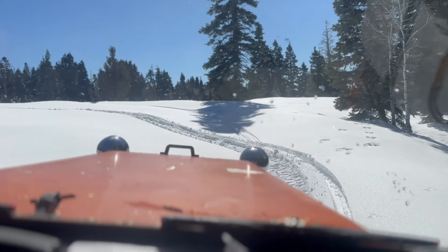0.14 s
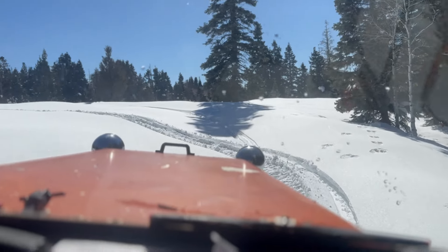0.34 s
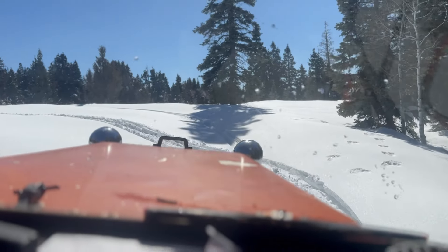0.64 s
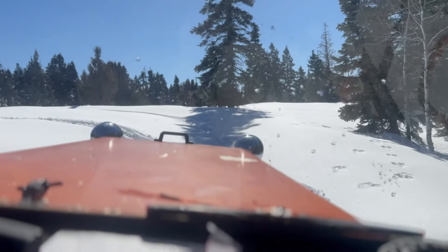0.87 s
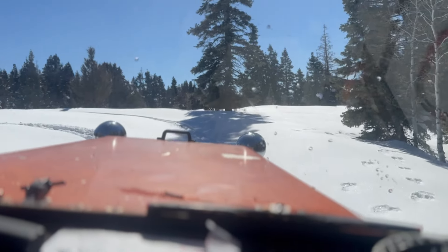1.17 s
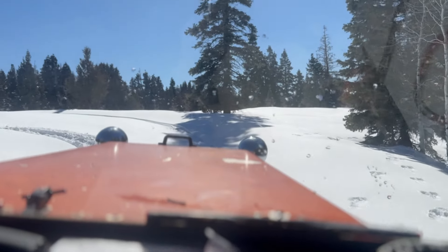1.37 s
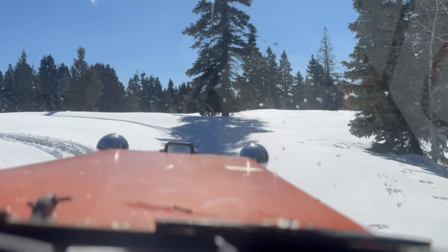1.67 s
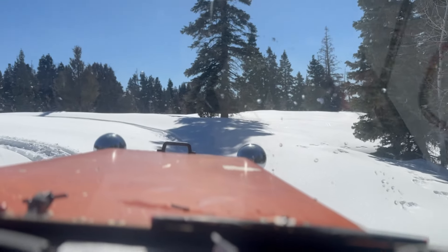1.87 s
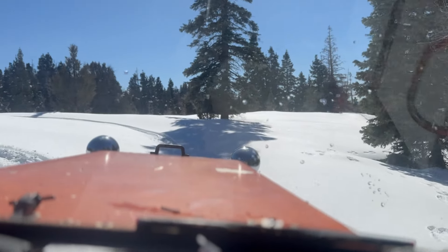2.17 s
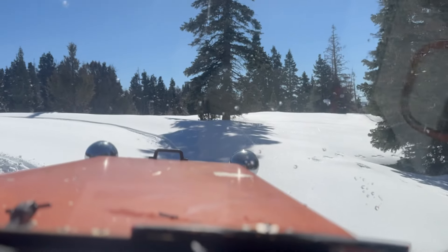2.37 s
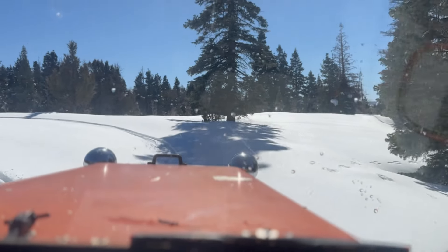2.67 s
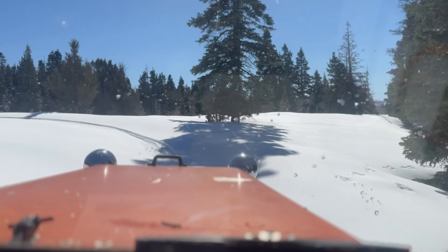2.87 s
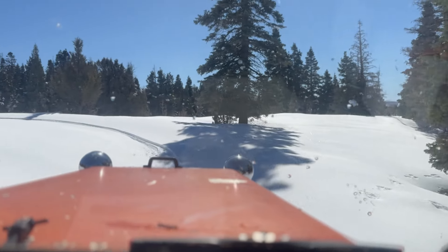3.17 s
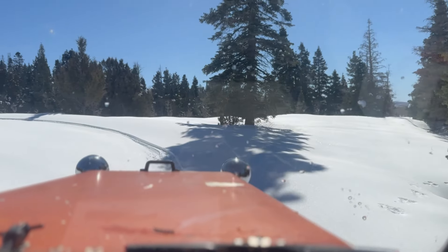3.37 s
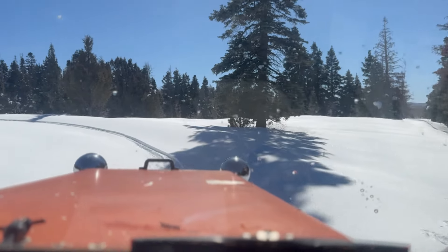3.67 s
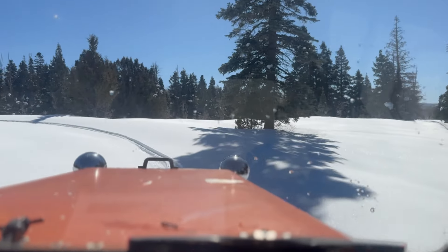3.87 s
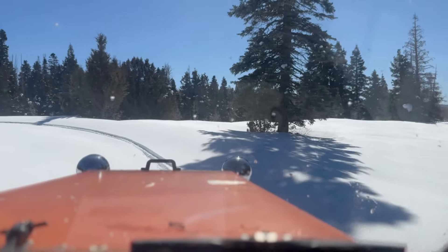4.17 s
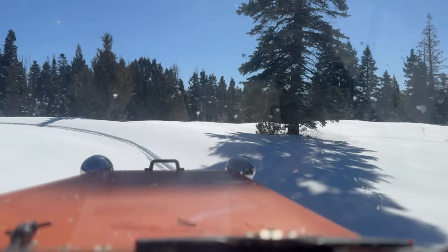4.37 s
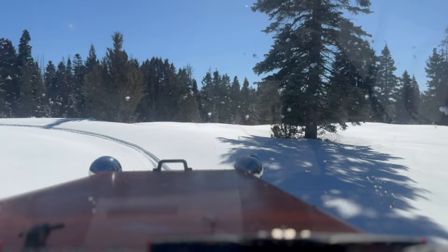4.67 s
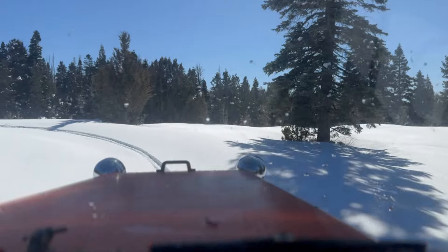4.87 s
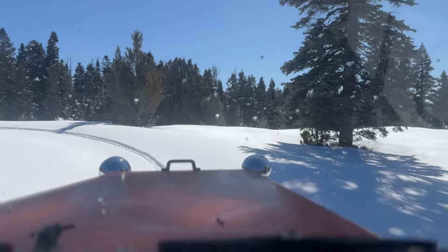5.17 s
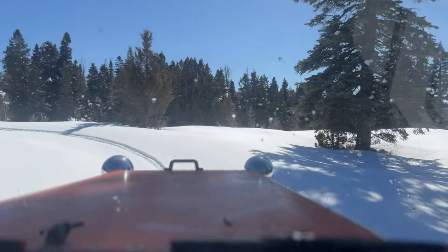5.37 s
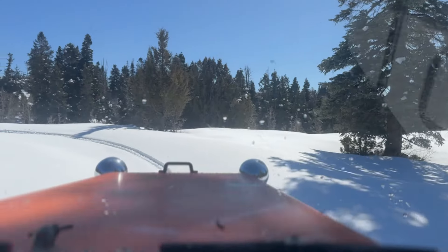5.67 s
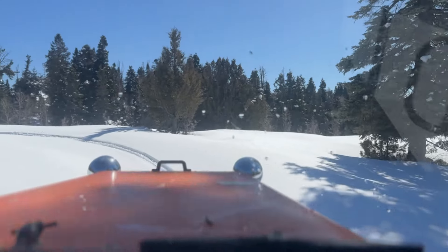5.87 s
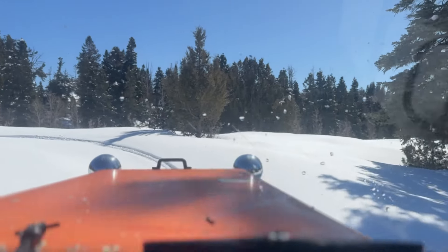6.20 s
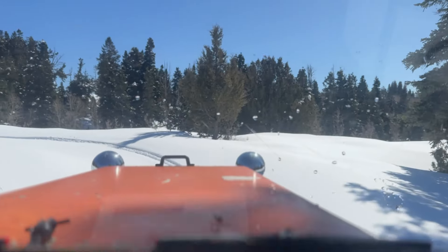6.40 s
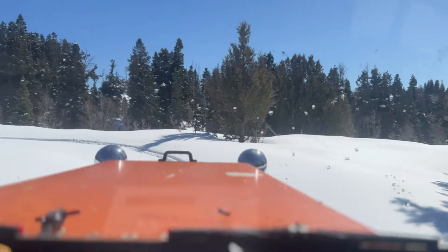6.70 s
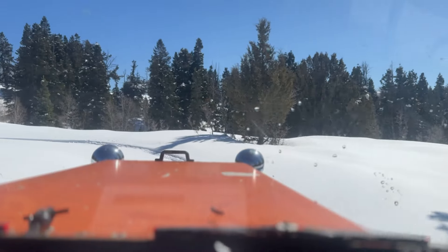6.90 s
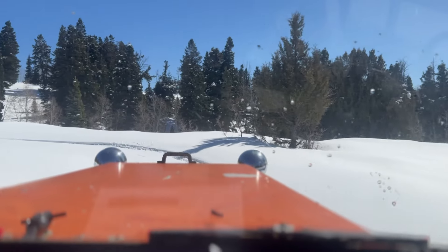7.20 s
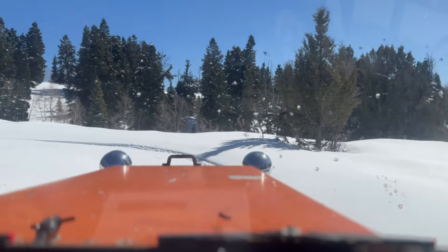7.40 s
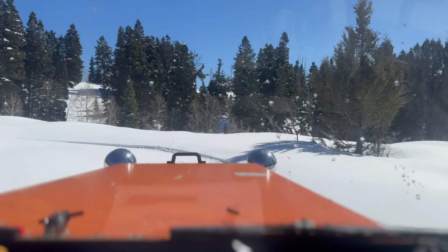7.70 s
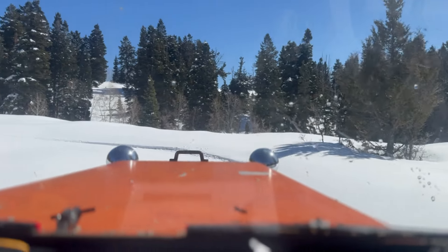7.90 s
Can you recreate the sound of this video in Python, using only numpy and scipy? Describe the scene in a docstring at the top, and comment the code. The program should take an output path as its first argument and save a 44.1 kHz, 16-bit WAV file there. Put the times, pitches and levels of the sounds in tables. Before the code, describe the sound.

A steady drive over packed snow, captured in a small resonant cab. A dominant low engine hum holds throughout, sagging gently in pitch, rising a little midway, then sinking and growing boomier. Beneath it is rough track rumble; above it are growling overtones, combustion clatter, a wavering fan whine, thin metallic ringing and faint grainy hiss. Light rattling ticks and brief dull knocks punctuate the unbroken drone.

```python
"""Tracked snow vehicle, cab interior

Steady drive along a trail, engine near 1600 rpm. The fifth order booms, louder as the engine slows
towards a cab air resonance; the other orders are sine tones whose levels move with the crank speed.
Cleat tones and low noise rumble through the floor; a belt-driven fan and other accessories whine.
Pulsed noise is the clatter of combustion and valves; loose fittings tick, bodywork knocks and rings,
thin metallic partials come and go, and a faint grainy hiss lies on top."""
import sys
import numpy as np
from scipy import signal
from scipy.fft import rfft, irfft, next_fast_len
from scipy.io import wavfile

SR = 44100
rng = np.random.default_rng(int(sys.argv[2]) if len(sys.argv) > 2 else 0)


def store_wav(level_fs):
    """Save 16-bit WAV to argv[1]."""
    pcm = np.round(np.clip(np.atleast_2d(level_fs), -1, 1) * 32767)
    wavfile.write(sys.argv[1], SR, pcm.T.astype(np.int16))


N = 355005

CONTROL_STEP = 100  # samples between slow control values
CRUISE_TURNS_PER_S = 26.4
CLEATS_PER_TURN = .752
FAN_BLADES_PER_TURN = 24.9  # at mean speed
FAN_SLIP_S_PER_TURN = .005  # share of blade rate lost per turn/s below mean speed
CUTOFF_HZ = 15900

# crank speed: (time [s], speed [turns/s])
CRANK_SPEED = [(0, 27.18), (0.25, 27.05), (0.7, 26.71), (1.15, 26.78), (1.65, 26.35), (2.05, 26.26),
               (2.75, 26.44), (3.45, 27.12), (3.9, 27.25), (4.45, 27.23), (4.85, 26.72), (5.25, 26.23),
               (5.7, 25.37), (6.15, 25.49), (6.5, 25.93), (6.95, 26.07), (7.35, 25.71), (8.05, 25.51)]
# strong engine tones: (order [per crank turn], level away from resonance [dB])
BOOM_ORDERS = [(3, -34), (4, -38), (5, -20), (8, -40.5)]
# cab air resonances: (centre [Hz], width [Hz], lift [dB])
CAB_AIR = [(76.6, 5.1, 9), (127.86, 15.6, 7), (201.9, 25, 12.5)]
# weaker engine tones: (order [per crank turn], left [dB], right [dB] at cruise before trim,
# rise [dB per turn/s above cruise], bow [dB per (turn/s)^2], right-ear lag [rad])
GROWL_ORDERS = [(6, -35.5, -32.5, 2.5, 1.0, -0.2), (7, -46.0, -38.5, -7.0, -1.0, -0.2),
                (11, -43.0, -40.5, 1.5, 4.0, 1.1), (12, -43.0, -48.0, -2.5, 0.0, 0.1),
                (13, -38.0, -41.0, 0.0, 1.0, -0.0), (14, -44.0, -45.0, -1.0, -3.0, 1.5),
                (15, -48, -49, 0, 0, 0.5), (16, -43.5, -45.0, -1.5, 1.0, -1.6),
                (17, -58.5, -47.5, -4.0, 4.0, -1.2), (18, -45.5, -44.0, 2.5, 0.0, -0.8),
                (19, -50.5, -47.5, 6.5, 2.0, -1.7), (20, -64.0, -54.0, -7.0, 3.0, -1.5),
                (21, -54.5, -40.5, 4.5, 2.0, -2.6), (22, -45.5, -39.0, 4.0, -3.0, -0.5),
                (23, -60.0, -50.0, -7.0, -2.0, -0.5), (24, -53.5, -52.0, -0.5, 2.0, -0.5),
                (25, -46.5, -45.5, 5.5, -7.0, -0.3), (26, -50.0, -51.5, 3.5, 1.0, -2.2),
                (27, -46.5, -49.5, 1.0, 5.0, -0.1), (28, -51.0, -46.0, 1.5, -2.0, 0.7),
                (29, -60.5, -52.0, 3.5, 3.0, -0.3), (30, -53.0, -54.0, 1.0, 2.0, 1.2),
                (31, -51.5, -51.5, -13, -14, 0.1), (32, -55.5, -56.0, -7.0, 5.0, 1.9),
                (33, -54.5, -56.0, 1.0, 5.0, -1.9), (35, -51.5, -54.5, 2.0, 0.0, -1.0),
                (36, -54.0, -54.5, 2.0, 8.0, -0.6), (37, -51.5, -45.0, -0.5, -5.0, -1.7),
                (38, -50.0, -55.5, -2.5, 2.0, -2.1), (39, -51.5, -47.0, -4.0, -5.0, -1.5),
                (40, -54.5, -52.5, -3.0, 3.0, -1.4), (41, -55.5, -56.0, 0.0, 7.0, -1.5),
                (49, -56.5, -56.0, 0.5, 7.0, -0.9), (50, -58.5, -57.0, 7.0, 5.0, -1.1),
                (53, -56.0, -55.5, 5.0, 0.0, -1.9), (54, -54.0, -55.0, 0.0, -2.0, 3.1),
                (64, -54, -58, 7, -9, 0.2)]
# momentary swells or dips of single tones: (time [s], length [s], order [per crank turn], lift [dB])
SWELLS = [(.55, .6, 22, 4), (1.6, .7, 22, -4), (3.15, .6, 22, 4), (4.1, .9, 22, -3), (6.4, 1.1, 22, -12),
          (5.12, .25, 31, 4), (6.95, .5, 31, 6), (7.3, .4, 36, 10.5), (7.87, .2, 36, 7), (1.05, .45, 64, 6),
          (3.1, .45, 64, 7), (4.65, .3, 64, 4), (5.2, .4, 64, 9), (8.05, 3, 15.4, -8)]
# accessory tones: (order [per crank turn], level [dB])
ACCESSORIES = [(15.4, -44), (24.2, -51), (45.38, -50.5), (46.2, -52), (58.3, -56), (93.1, -62)]
# cab panel resonances: (centre [Hz], width [Hz], lift at full share [dB])
PANELS = [(588, 38, 12.5), (630, 36, 11), (733, 17, 7.5), (805, 19, 12), (985, 80, 7), (1178, 34, 15),
          (1354, 93, 9), (1712, 50, 12), (2530, 40, 9)]
# ringing metal of engine and fittings: (centre [Hz], width [Hz], lift [dB])
METAL = [(3610, 40, 5.5), (4000, 35, 3), (4400, 50, 3.5), (5205, 62, 4), (5440, 60, 3), (5790, 60, 8),
         (5950, 90, 7.5)]
# mechanical noise density before trim and resonances: (frequency [Hz], left [dB/Hz], right [dB/Hz])
CLATTER_SPECTRUM = [(247, -59.5, -54), (307, -59.5, -59.5), (378, -59.5, -60), (460, -62, -62.5),
                    (517, -66, -63.5), (646, -59.5, -61.5), (705, -67, -67), (756, -64.5, -64),
                    (844, -66, -64), (970, -60.5, -63), (1130, -68, -67.5), (1200, -65.5, -67.5),
                    (1370, -65, -67.5), (1460, -69.5, -66.5), (1820, -72, -73), (2040, -72, -68.5),
                    (2250, -80, -77), (2370, -74.5, -72), (2650, -77, -75), (2960, -74, -76.5),
                    (3630, -80, -82.5), (4970, -82, -86.5), (6400, -83, -90.5), (7650, -81.5, -89.5),
                    (9530, -92, -87.5), (10060, -101, -101)]
# noise common to both ears: (frequency [Hz], share of power [0-1])
EAR_LIKENESS = [(200, .8), (400, .58), (1000, .58), (4000, .33), (8000, .7), (14000, .8)]
# upper clatter band: (time [s], level [dB])
HARDNESS = [(0, -0.5), (1.5, -1), (3.2, 0), (3.8, 0), (4.5, 1.5), (4.75, -1), (5.5, -1.5), (6.1, 0),
            (8.05, -0.5)]
# fan singing out: (time [s], length [s], multiple of blade rate, lift [dB])
WHINES = [(.08, .25, 3, 6), (1.88, .44, 3, 11.5), (2.93, .16, 3, 6), (5.27, .55, 3, 12.5), (5.95, .8, 1, 5),
          (6.75, .68, 3, 12.5)]
# track cleats: (multiple of cleat rate, level before ride [dB])
CLEATS = [(1, -50), (2, -30), (3, -28.5), (6, -27), (12, -45)]
# harder cleat slaps: (time [s], length [s], multiple of cleat rate, lift [dB])
SLAPS = [(.55, .4, 3, 6), (1.75, .6, 2, 9), (3.45, .35, 3, 8), (4.35, .4, 6, 12.5), (6.25, .4, 2, 8),
         (7.15, .35, 2, 8)]
# running gear through the floor, before ride and trim: (frequency [Hz], density [dB/Hz])
RUMBLE_SPECTRUM = [(16, -81), (24, -75.5), (37, -46), (60, -36.5), (90, -36.5), (115, -35.5), (160, -39.5),
                   (190, -43.5), (240, -56)]
# ride roughness: (time [s], gain on all track sound [dB])
RIDE = [(0, -3.5), (1.1, -4.5), (1.9, -4.5), (2.7, -2.5), (3.4, -6), (4.1, -6.5), (4.8, -3), (5.3, -6),
        (5.9, -4.5), (6.6, -5.5), (7.3, -4.5), (8.05, -5)]
# loose fittings: (time [s], nominal level [dB])
TICKS = [(.83, -37), (1.1, -39), (1.4, -46), (2.73, -44), (2.976, -41), (3.126, -41), (4.34, -37),
         (4.431, -44), (6.139, -46), (6.575, -45), (7.615, -47)]
# bodywork blows: (time [s], nominal level [dB])
KNOCKS = [(1.422, -33), (7.365, -27), (7.369, -32), (7.718, -37), (7.884, -35)]
# bodywork modes: (frequency [Hz], mean level re blow [dB], t60 [s])
BODYWORK = [(921, -6, .05), (1310, -5, .03), (1604, 0, .035), (1900, -7, .02), (2290, -6, .022),
            (2510, -13, .04)]
# thin metallic rings: (time [s], length [s], frequency [Hz], level before pan [dB])
RINGS = [(.75, 1.0, 3610, -64), (1.4, .4, 5965, -64), (2.6, .5, 4375, -66), (2.7, .5, 5950, -66),
         (3.85, .5, 3595, -62), (4.0, .9, 4004, -62), (4.1, .8, 4400, -62), (4.45, 0.3, 4410, -58.5),
         (6.03, 0.25, 5950, -60), (6.15, .45, 4385, -60), (6.28, .25, 3180, -59), (6.75, .2, 3610, -60),
         (7.95, 0.3, 4380, -62)]


def from_db(db):
    """Decibels to gain."""
    return 10 ** (np.asarray(db) / 20)


def rms_one(x):
    """Scale to rms 1."""
    return x / np.sqrt(np.mean(x ** 2) + 1e-20)


def in_time(rows):
    """Columns of a time curve, interpolated to every sample."""
    time_s, *columns = np.transpose(rows)
    return [np.interp(np.arange(N) / SR, time_s, c) for c in columns]


def at_hz(points, hz):
    """Columns of a spectrum, interpolated over log frequency."""
    knots_hz, *columns = np.transpose(points)
    return np.array([np.interp(np.log(hz + 1e-3), np.log(knots_hz), c) for c in columns])


def hold(control):
    """Hold slow control values up to sample rate, as float32."""
    return np.repeat(control.astype(np.float32), CONTROL_STEP)[:N]


def drift(rate_hz):
    """Slow chance with spread 1: white noise through a two-pole lowpass at the control rate."""
    pole = np.exp(-2 * np.pi * CONTROL_STEP * rate_hz / SR)
    white = rng.standard_normal(N // CONTROL_STEP + 1002)
    slow = signal.lfilter([1], [1, -2 * pole, pole * pole], white)[1000:]  # drop the run-in
    return np.interp(np.arange(N) / CONTROL_STEP, np.arange(len(slow)), rms_one(slow))


def bandpass(low_hz, high_hz):
    """Second-order Butterworth band."""
    return signal.butter(2, [low_hz, high_hz], "band", fs=SR, output="sos")


def fft_grid():
    """FFT size and its bin frequencies."""
    size = next_fast_len(N)
    return size, np.arange(size // 2 + 1) * SR / size


def coloured(white, gain_at):
    """Shape unit white noise to a density given as a function of frequency."""
    size, hz = fft_grid()
    return irfft(rfft(white, size) * gain_at(hz), size)[..., :N] * np.sqrt(SR / 2)


def tone(cycles, lag_rad=0.):
    """Stereo sine of rms 1 with random start phase; the right ear trails by lag_rad."""
    cycles = cycles + rng.random()
    angle = (2 * np.pi * (cycles - np.floor(cycles))).astype(np.float32)
    return np.float32(np.sqrt(2)) * np.array([np.sin(angle), np.sin(angle - np.float32(lag_rad))])


def bells_db(events, multiple):
    """Sum of bell-shaped level changes for one tone."""
    t = np.arange(N) / SR
    return sum(db * np.exp(-(2 * (t - s) / length_s) ** 2)
               for s, length_s, k, db in events if k == multiple)


def lift_db(modes, hz):
    """Summed lift of a set of resonances at each frequency."""
    return sum(db / (1 + (2 * (hz - centre) / width) ** 2) for centre, width, db in modes)


def ripple(hz, width_hz=70):
    """Cab reflections: a chance pattern along frequency, spread 1."""
    knots_hz = np.arange(0, SR, width_hz)
    return rms_one(np.interp(hz, knots_hz, rng.standard_normal(len(knots_hz))))


def swelling(order, turns, turns_per_s, waver_db=2.4, diffuse_hz=500):
    """Tone of mean level rms 1, swelling at panel resonances; short waves waver and lag more."""
    hz = order * turns_per_s[::CONTROL_STEP]
    shortness = min(hz.mean() / diffuse_hz, 1.3)
    waver = waver_db * shortness * drift(2)[::CONTROL_STEP]
    gain = rms_one(from_db(lift_db(PANELS, hz) + waver))
    lag_rad = shortness * rng.choice([-1, -1, 1])
    return hold(gain) * tone(order * turns, lag_rad)


def fizz(grains_per_s=1500, size_db=1.5, flicker_db=.85, level_db=-61.3):
    """Faint treble hiss: decaying random grains gate noise in a high band."""
    sizes_db = size_db * np.minimum(rng.exponential(1, N), 5)
    grains = (rng.random(N) < grains_per_s / SR) * from_db(sizes_db)
    envelope = signal.lfilter([1], [1, -.985], grains + 1e-18)
    grit = envelope * rng.standard_normal(N) * from_db(flicker_db * drift(10))
    return from_db(level_db) * rms_one(signal.sosfilt(bandpass(8000, 18000), grit))


def ringing(waver_hz=7, flutter_db=2.5, pan_db=4.5, lag_rad=-0.43):
    """High metallic partials, unsteady in pitch and level, rise and sink along bell curves."""
    t = np.arange(N) / SR
    waver_cycles = np.cumsum(waver_hz * drift(9)) / SR
    out = 0
    for s, length_s, hz, db in RINGS:
        bell = np.exp(-(2 * (t - s) / length_s) ** 2)
        out = out + from_db(db) * bell * tone(hz * t + waver_cycles, lag_rad)
    return from_db([[pan_db], [-pan_db]]) * from_db(flutter_db * drift(13)) * out


def ticks(decay_s=.0012, low_hz=3500, high_hz=8500):
    """Loose parts touch: short decaying bursts of band noise."""
    hits = np.zeros(N)
    for s, db in TICKS:
        hits[int(s * SR)] = from_db(db)
    envelope = signal.lfilter([1], [1, -np.exp(-1 / (decay_s * SR))], hits + 1e-18)
    noise = signal.sosfilt(bandpass(low_hz, high_hz), rng.standard_normal((2, N)))
    return envelope * rms_one(noise)


def knocks(contact_s=.001, spread_db=1.5):
    """Soft blows ring the bodywork modes, each with its own strength and phase at each ear."""
    out = np.zeros((2, N + SR))
    t = np.arange(SR // 8) / SR
    onset = 1 - np.exp(-t / contact_s)
    for s, db in KNOCKS:
        start = int(s * SR)
        for hz, mode_db, t60_s in BODYWORK:
            ear_db = spread_db * rng.standard_normal((2, 1))
            decay = from_db(db + mode_db + ear_db - 60 * t / t60_s)
            phase_rad = rng.uniform(0, 2.6, (2, 1))
            out[:, start:start + len(t)] += decay * onset * np.sin(2 * np.pi * hz * t + phase_rad)
    return out[:, :N]


def tracks(turns, rumble_db=-3, beat_waver_db=-0.5, sway_cycles=0.061, top_hz=235):
    """Cleats beat over the sprockets, slaps lift single harmonics; packed snow shakes the floor."""
    ride_db, = in_time(RIDE)
    cleats = CLEATS_PER_TURN * turns + sway_cycles * drift(2.62)
    beat = 0
    for k, db in CLEATS:
        level_db = db + bells_db(SLAPS, k) + beat_waver_db * drift(3)
        beat = beat + from_db(level_db) * tone(k * cleats)

    def floor_gain(hz):
        """Rumble density between a 10 Hz floor and a steep top."""
        return from_db(at_hz(RUMBLE_SPECTRUM, hz)) * (hz > 10) / np.sqrt(1 + (hz / top_hz) ** 16)

    floor = coloured(rng.standard_normal(N), floor_gain)
    return from_db(ride_db) * (beat + from_db(rumble_db) * floor)


def fan(turns_per_s, blade_db=-47, whine_db=-56, waver_cycles=.04, whine_waver_db=1.1):
    """Blade tone of a fan whose belt slips as the engine labours; its third harmonic sings out."""
    slip = 1 + FAN_SLIP_S_PER_TURN * (turns_per_s - turns_per_s.mean())
    blade_hz = FAN_BLADES_PER_TURN * turns_per_s * slip
    passes = np.cumsum(blade_hz) / SR + waver_cycles * drift(2.3)
    blade = from_db(blade_db + bells_db(WHINES, 1)) * swelling(1, passes, blade_hz)
    third_db = whine_db + bells_db(WHINES, 3) + whine_waver_db * drift(10)
    return blade + from_db(third_db) * tone(3 * passes, lag_rad=.8)


def accessories(turns, turns_per_s, slip_turns=0.003):
    """Driven parts follow the crank, with a little wandering slip."""
    belt = turns + slip_turns * drift(2.5)
    return sum(from_db(db + bells_db(SWELLS, k)) * swelling(k, belt, turns_per_s)
               for k, db in ACCESSORIES)


def whirr(turns, turns_per_s, level_db=-57.5, fall_db_per_octave=-17, knee_order=50, spread_db=1.5):
    """Valve and timing gears fill the remaining orders from 20 to 101, fading above a knee."""
    orders = np.setdiff1d(np.arange(20, 102), np.array(GROWL_ORDERS)[:, 0])
    fall_db = fall_db_per_octave * np.log2(np.maximum(orders / knee_order, 1))
    gains = from_db(fall_db + spread_db * rng.standard_normal(len(orders)))
    return from_db(level_db) * sum(np.float32(g) * swelling(k, turns, turns_per_s)
                                   for k, g in zip(orders, gains))


def clatter(turns, level_db=-1.3, flicker_db=0.6, panel_share=0.3, low_hz=215, diffuse_hz=600):
    """Combustion and valve noise pulses with the crank, coloured by panels, metal and reflections."""
    # six, three and one pulses per turn
    pulse_db = (.6 * np.cos(12 * np.pi * turns) + .5 * np.cos(6 * np.pi * turns)
                + 1.7 * np.cos(2 * np.pi * turns))
    noise = rng.standard_normal((3, N)) * from_db(level_db + flicker_db * drift(17))
    size, hz = fft_grid()
    # pulsing weakens towards the treble
    depth = .2 + .8 / (1 + (hz / 2500) ** 4)
    common, *own = depth * rfft(noise * from_db(pulse_db), size) + (1 - depth) * rfft(noise, size)
    share = at_hz(EAR_LIKENESS, hz)
    # reflections put short waves out of step between the ears
    skew_rad = np.minimum(hz / diffuse_hz, 2) * ripple(hz, 250)
    skewed = common * np.exp(.5j * skew_rad * [[1], [-1]])
    ears = np.sqrt(share) * skewed + np.sqrt(1 - share) * np.array(own)
    standing_db = 1.3 * np.minimum(hz / 2500, 1) * np.array([ripple(hz), ripple(hz)])
    resonance_db = panel_share * lift_db(PANELS, hz) + lift_db(METAL, hz)
    spectrum_db = at_hz(CLATTER_SPECTRUM, hz) + resonance_db + standing_db
    low_cut = 1 / np.sqrt(1 + (low_hz / (hz + 1)) ** 8)
    return irfft(ears * from_db(spectrum_db) * low_cut, size)[:, :N] * np.sqrt(SR / 2)


def harden(noise, low_hz=2700, high_hz=5300):
    """The hard upper band of the clatter follows its own level curve."""
    level_db, = in_time(HARDNESS)
    band = signal.sosfiltfilt(bandpass(low_hz, high_hz), noise)
    return noise + (from_db(level_db) - 1) * band


def growl(turns, turns_per_s, trim_db=.5, waver_db=1.0):
    """Weaker orders slide through cab standing waves: level is quadratic in crank speed."""
    excess = turns_per_s[::CONTROL_STEP] - CRUISE_TURNS_PER_S
    out = 0
    for k, left_db, right_db, rise, bow, lag_rad in GROWL_ORDERS:
        moving_db = (waver_db * drift(3) + bells_db(SWELLS, k))[::CONTROL_STEP]
        gain = from_db(trim_db + rise * excess + bow * excess ** 2 + moving_db)
        ears = from_db([[left_db], [right_db]]).astype(np.float32)
        out = out + ears * hold(gain) * tone(k * turns, lag_rad)
    return out


def boom(turns, turns_per_s, flutter_db=-0.18, lag_rad=-0.26):
    """Low orders fill the cab, louder near its air resonances, with a slight level flutter."""
    out = 0
    for k, db in BOOM_ORDERS:
        level_db = db + lift_db(CAB_AIR, k * turns_per_s) + flutter_db * drift(32)
        out = out + from_db(level_db) * tone(k * turns, lag_rad)
    return out


def scene():
    """Sum of all sources; engine, accessories, fan and tracks share one crank."""
    turns_per_s, = in_time(CRANK_SPEED)
    turns = np.cumsum(turns_per_s) / SR + .001 * drift(6)
    background = fizz() + ringing() + ticks() + knocks()
    driven = tracks(turns) + fan(turns_per_s) + accessories(turns, turns_per_s)
    mechanism = whirr(turns, turns_per_s) + harden(clatter(turns))
    engine = mechanism + growl(turns, turns_per_s) + boom(turns, turns_per_s)
    return background + driven + engine


def record(dry):
    """Steep elliptic lowpass: 0.1 dB ripple, 80 dB stopband."""
    return signal.sosfilt(signal.ellip(10, .1, 80, CUTOFF_HZ, fs=SR, output="sos"), dry)


dry = scene()
out = record(dry)
store_wav(out)
```